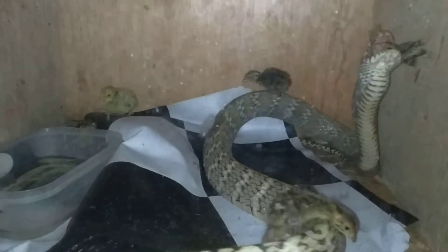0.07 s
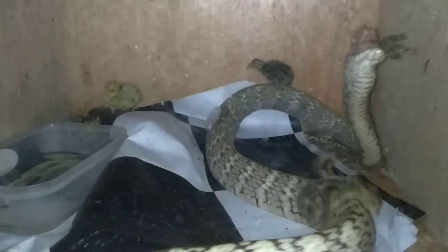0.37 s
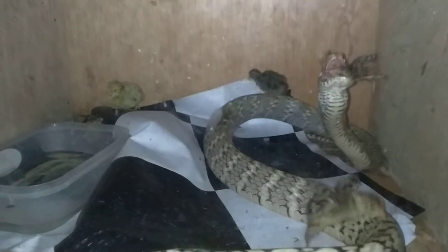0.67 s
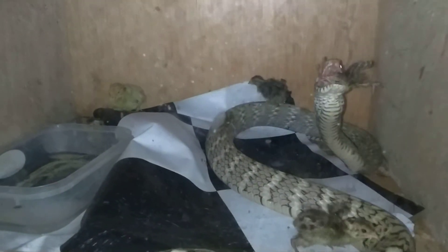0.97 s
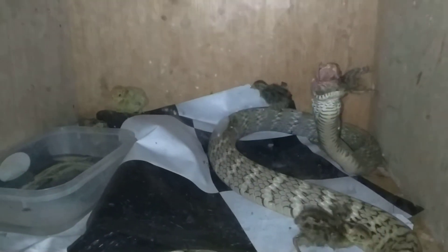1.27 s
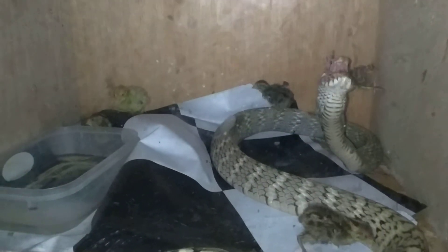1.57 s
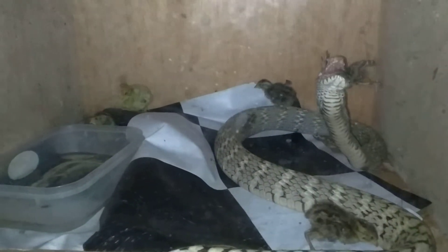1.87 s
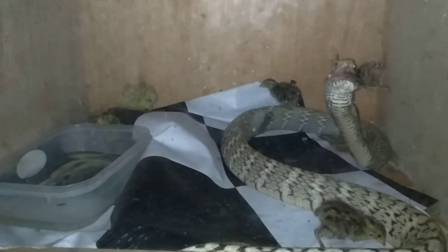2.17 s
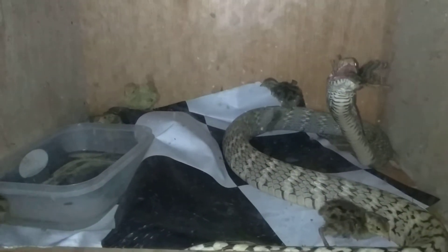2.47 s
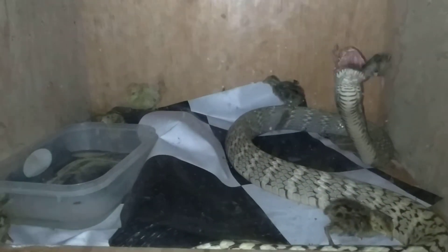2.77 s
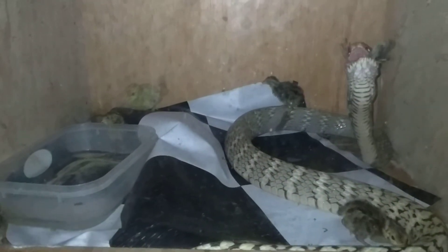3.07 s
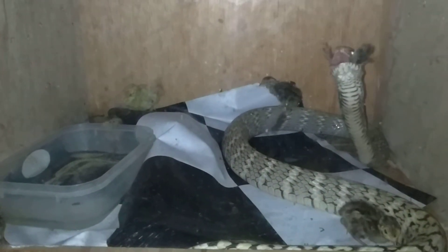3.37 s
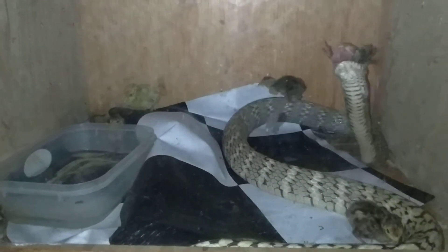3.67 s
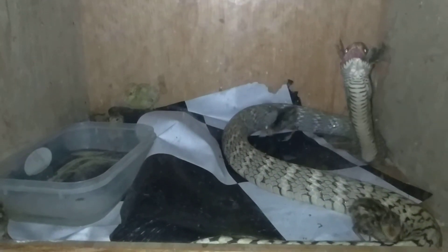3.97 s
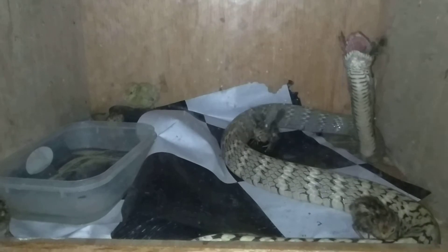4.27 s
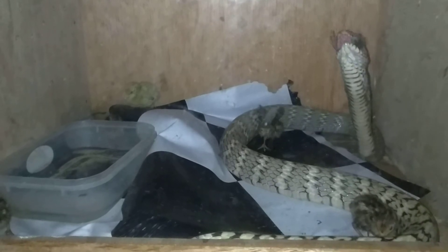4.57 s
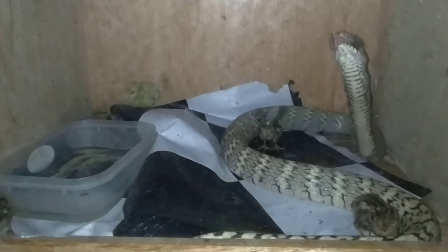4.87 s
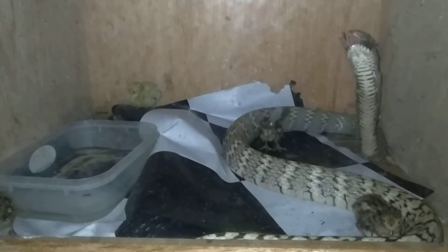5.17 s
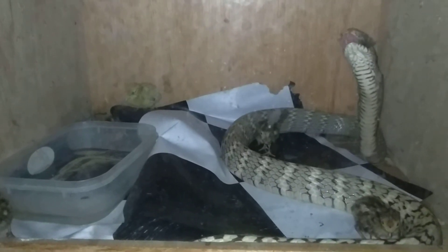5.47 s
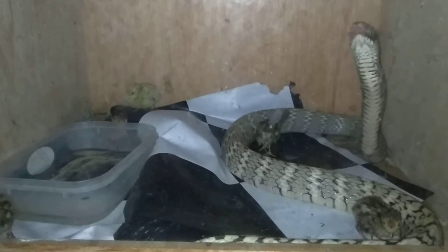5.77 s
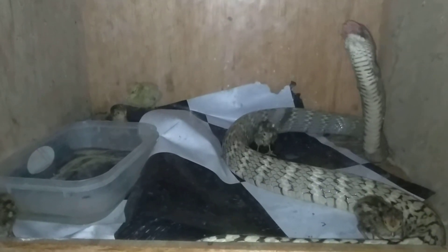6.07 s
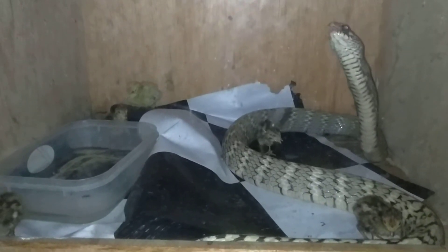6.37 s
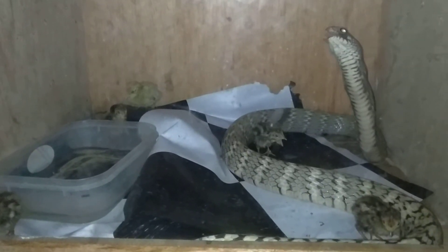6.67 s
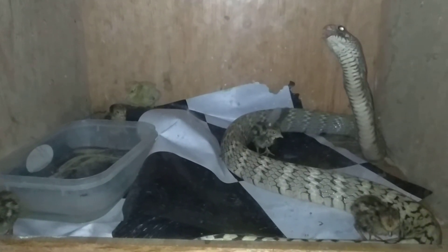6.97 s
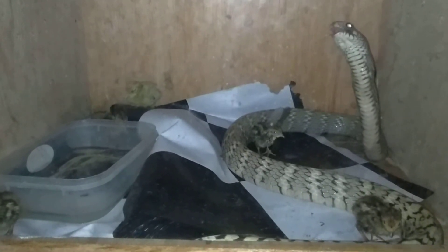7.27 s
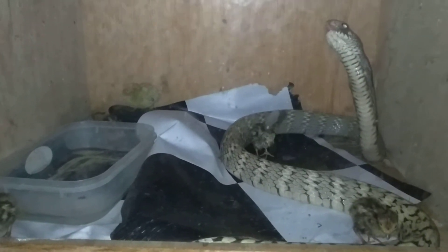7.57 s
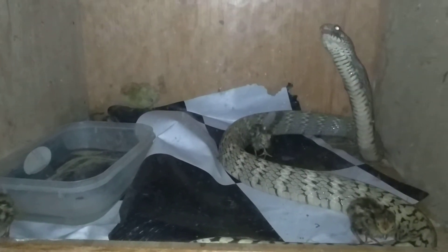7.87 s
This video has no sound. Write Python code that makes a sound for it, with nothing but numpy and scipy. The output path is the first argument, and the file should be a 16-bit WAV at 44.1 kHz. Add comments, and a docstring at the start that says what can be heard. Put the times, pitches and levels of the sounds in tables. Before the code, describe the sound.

After a short brush and click on the microphone, small chicks cheep and scuffle in a wooden box, their peeps growing louder.

```python
"""A plywood box in a quiet room. Chicks peep, softly at first, then loudly: harmonic syrinx tones shaped
by throat and beak, with thin hoarse cheeps between. Their feet scuff a cloth; the walls echo both,
and the panels ring low when bumped. Something brushes the right microphone port and it clicks.
The room rumbles and hisses faintly; a thin electric whine sits in the right channel."""
import sys
import numpy as np
from scipy import signal
from scipy.fft import rfft, irfft
from scipy.io import wavfile

SR = 44100
rng = np.random.default_rng(int(sys.argv[2]) if len(sys.argv) > 2 else 0)


def generate_wav(signal):
    """Clip the signal to [-1, 1] and save it as 16-bit WAV at the path in sys.argv[1]."""
    frames = np.transpose(np.atleast_2d(signal))
    scaled = np.clip(frames, -1, 1) * 32767
    pcm = np.round(scaled).astype(np.int16)
    wavfile.write(sys.argv[1], SR, pcm)


N = 349713

# rumble spectrum: freq_hz, density_db
RUMBLE_SPECTRUM = [(15, -2), (35, -1), (55, 0), (70, -7.5), (110, -9), (165, -13.5), (280, -15.5),
                   (400, -19), (550, -27.5), (950, -28), (1400, -37), (1700, -38.5), (4000, -72)]
# rumble, left against right: freq_hz, correlation
RUMBLE_CORRELATION = [(30, 0.88), (100, 0.97), (250, 0.99), (500, 0.87), (1000, 0.055), (16000, 0.94)]
# room peaks and one dip: freq_hz, width_hz, gain_db
ROOM_MODES = [(55.9, 4.6, 8), (81.7, 6.3, 0.5), (307, 49, 2), (328, 11, -9.5), (859, 33, 4)]
# hiss spectra, left then right: freq_hz, density_db
HISS_SPECTRA = [
    [(1000, -9.5), (1900, 0), (2400, 5.5), (3000, -3.5), (5000, -12), (6100, -10), (8200, -10.5),
     (11000, -16), (16000, -20)],
    [(1000, -8.5), (1900, -9.5), (2400, -6), (3000, -2), (5000, -5), (6100, -5), (8200, -4), (11000, -8),
     (16000, -19)],
]
# narrow hiss bands: freq_hz, width_hz, level_db, pan_db (left minus right)
HISS_BANDS = [(2377, 19, -68, -1), (7324, 290, -66, 10), (6840, 880, -64.5, 3.5)]
# whine harmonics: multiple, level_db
WHINE_HARMONICS = [(2, -67.5), (3, -66.5), (4, -71.5), (5, -70.5), (6, -75.5)]
# bumps on the box: start_s, freq_hz, level_db, t60_s
PANEL_BUMPS = [(3.235, 45.6, -28, 0.28), (3.479, 105, -36.5, 0.26), (3.68, 144, -29, 0.048),
               (3.701, 58, -27.5, 0.27), (5.712, 236, -29.5, 0.0098)]
# brush spectrum: freq_hz, density_db
BRUSH_SPECTRUM = [(40, -2.5), (110, -10), (250, -0.5), (400, -7), (560, -4.5), (800, -16.5), (1100, -21),
                  (2000, -21.5), (9000, -24), (12500, -31.5), (16000, -48)]
# impulses at the right port: start_s, level_db
PORT_CLICKS = [(0.576, -29.5), (1.182, -11), (1.1842, -19), (1.377, -35)]
# click resonances: freq_hz, gain_db, t60_s
CLICK_MODES = [(4420, -6, .0018), (6950, -1, 0.0012), (9200, -34, 0.00059)]
# wall echoes, left then right: delay_s, gain_db
WALL_ECHOES = [
    [(.0021, -16.5), (.0053, -18.5), (.0094, -7)],
    [(.0016, -17), (.0061, -51), (.0112, -51)],
]
# cloth friction spectrum: freq_hz, density_db
CLOTH_SPECTRUM = [(1200, 1), (2500, -5), (5000, -4), (8000, 0.5), (11000, -4.5), (13000, -13), (16000, -15)]
# feet on cloth: start_s, length_s, level_db, pan_db
FOOT_SCUFFS = [(.171, 0.063, -56.5, -2), (0.393, .034, -53.5, -2), (0.463, 0.067, -51, -6),
               (0.65, 0.095, -48, -13), (.75, 0.067, -52.5, 0), (2.131, 0.065, -51, 4),
               (2.18, 0.12, -49.5, 4), (2.29, .08, -51.5, 4), (2.581, .012, -44, 3), (2.594, .022, -51, 8),
               (3.875, .02, -49.5, 3), (3.975, 0.015, -53, 5), (4.036, 0.037, -54.5, 3),
               (6.432, 0.02, -55, 8)]
# hoarse cheeps: start_s, length_s, start_hz, end_hz, relative_db, octave_db, rasp_ratio
HOARSE_CHEEPS = [(0.975, .06, 2900, 2150, -67.5, 13.5, 0.031), (3.24, 0.05, 2400, 2370, -60, 10, .02),
                 (3.422, .13, 3170, 2980, -61, -20, .012), (3.714, 0.24, 2900, 3990, -57, -20, .08),
                 (4.72, 0.054, 3125, 2950, -61.5, 8, .012), (4.754, .1, 3810, 3300, -57.5, -20, .034),
                 (4.772, 0.11, 3060, 2670, -58, -5, .018), (5.057, 0.11, 2940, 2950, -53.5, -8, 0.062),
                 (5.483, .06, 2850, 2830, -65, 7, 0.014), (5.531, .17, 3480, 3280, -57, -20, 0.018),
                 (5.55, 0.104, 2820, 2740, -55, -10, .009), (5.84, 0.2, 3250, 4300, -60, -20, 0.085),
                 (6.126, 0.041, 2480, 2630, -48, -5, .02), (6.27, 0.068, 2860, 2910, -46.5, -15, 0.049),
                 (7.731, 0.16, 2700, 3440, -54, -6, 0.16)]
# throat and beak response: freq_hz, gain_db
THROAT_RESPONSE = [(3300, -17), (3650, -3), (4400, -2.5), (5400, 6.5), (5950, -2), (6600, -9),
                   (7250, -17.5), (8400, -11.5), (9100, -18), (9700, -28.5), (11000, -20.5), (12200, -41),
                   (13300, -30), (14500, -47)]
# notes, one to three per peep: start_s, length_s, attack_s, pitch_hz, scoop_hz, rise_hz, level_db,
# opening_db (overtone gain of the open beak), undertone_db, pan_db
PEEP_NOTES = [(1.417, 0.056, .012, 2660, -1, 27, -60.5, -9, -24, 5),
              (1.469, 0.051, .006, 2530, 183, 15, -56, -14, -24, 6),
              (1.551, 0.028, 0.015, 2674, 183, 0, -53, -11, -24, 0),
              (2.429, 0.066, .012, 2456, 200, 8, -55.5, -8, -16, 10),
              (2.498, 0.039, .01, 2613, 113, -11, -58, 7, -9, 4),
              (3.138, 0.067, 0.017, 2400, 196, 9, -56, 9.5, -15, 4),
              (3.216, 0.061, 0.0069, 2597, 3, 27, -57.5, -0.5, -5, 4),
              (5.055, 0.049, 0.0081, 2380, 63, 50, -53, -11, -16, 2),
              (5.143, 0.022, .008, 2437, 224, 0, -53, -19, -15, 2),
              (5.172, 0.038, 0.013, 2370, 148, -17, -45.5, -2.5, -7, 2),
              (6.169, 0.054, 0.0098, 2460, 138, 22, -44, 7.5, -17, 4.5),
              (6.242, 0.084, 0.0036, 2204, 416, -3.5, -52.5, 16.5, -23, 3),
              (6.981, .084, 0.02, 2388, 92, 30.5, -43, 14.5, -16, 5),
              (7.078, 0.038, .0035, 2196, 338, 16, -45.5, 13, -34, 3),
              (7.128, 0.035, 0.0042, 2191, 3.5, 9, -48, 15.5, -26, 2),
              (7.837, 0.093, 0.0046, 2250, 120, 132, -42, 11.5, -22, 3)]

LEAD_S, RELEASE_S = .025, .0066   # soft voicing before a note; fade after it


def from_db(db):
    """Decibels to gain."""
    return 10 ** (np.asarray(db) / 20)


def unit_rms(x):
    """Scale to unit power."""
    return x / np.sqrt(np.mean(x ** 2) + 1e-20)


def at_hz(points, hz):
    """Interpolate over log frequency."""
    freq_hz, value = np.transpose(points)
    return np.interp(np.log(np.maximum(hz, 1)), np.log(freq_hz), value)


def pan(pan_db):
    """Constant-power gains for a left-minus-right level."""
    return unit_rms(from_db(np.array([[pan_db], [-pan_db]]) / 2))


def bins_hz():
    """Full-length FFT frequencies."""
    return np.arange(N // 2 + 1) * SR / N


def bell(hz, width_hz):
    """Resonance curve, peak 1."""
    return 1 / (1 + ((bins_hz() - hz) / width_hz * 2) ** 2)


def noise(spectrum):
    """Coloured noise, rms 1."""
    return unit_rms(irfft(rfft(rng.standard_normal(N)) * from_db(at_hz(spectrum, bins_hz())), N))


def wobble(rate_hz, size):
    """Low-passed random motion, rms 1."""
    sos = signal.butter(2, rate_hz, fs=SR, output="sos")
    return unit_rms(signal.sosfilt(sos, rng.standard_normal(size + SR // 4))[-size:])


def add(out, start_s, sound):
    """Mix in a stereo sound."""
    i = max(int(start_s * SR), 0)
    out[:, i:i + sound.shape[-1]] += sound[:, :max(N - i, 0)]


def room_rumble(level_db=-40.5, left_lag_s=.00016, start_db=-1, settle_s=.56):
    """Low noise shaped by room modes; reaches the right port first."""
    correlation = np.clip(at_hz(RUMBLE_CORRELATION, bins_hz()), -1, 1)
    mid = rfft(noise(RUMBLE_SPECTRUM)) * np.sqrt(1 + correlation)
    side = rfft(noise(RUMBLE_SPECTRUM)) * np.sqrt(1 - correlation)
    lag = np.exp(-2j * np.pi * bins_hz() * left_lag_s)
    modes = from_db(sum(gain_db * bell(hz, width_hz) for hz, width_hz, gain_db in ROOM_MODES))
    rumble = unit_rms(irfft(modes * np.array([(mid + side) * lag, mid - side]), N))
    swell_db = np.interp(np.arange(N) / SR, [0, settle_s], [start_db, 0])
    return rumble * from_db(level_db + swell_db)


def room_hiss(left_db=-57, right_db=-63.5):
    """Broad hiss plus narrow rushing bands."""
    out = from_db([[left_db], [right_db]]) * np.array([noise(spectrum) for spectrum in HISS_SPECTRA])
    for hz, width_hz, level_db, pan_db in HISS_BANDS:
        band = irfft(rfft(rng.standard_normal((2, N))) * bell(hz, width_hz), N)
        out += unit_rms(band) * from_db(level_db) * pan(pan_db)
    return out


def electric_whine(base_hz=2273.6, onset_s=.1, full_s=.75, leak_db=-27):
    """Steady harmonics, no fundamental; fades in on the right."""
    t = np.arange(N) / SR
    tone = sum(from_db(db) * np.sin(2 * np.pi * k * base_hz * t) for k, db in WHINE_HARMONICS)
    return np.sqrt(2) * tone * np.interp(t, [onset_s, full_s], [0, 1]) * from_db([[leak_db], [0]])


def panel_bumps():
    """Damped low rings of the box panels."""
    out, t = np.zeros((2, N)), np.arange(SR // 2) / SR
    for start_s, hz, level_db, t60_s in PANEL_BUMPS:
        add(out, start_s, np.sin(2 * np.pi * hz * t) * from_db(level_db - 60 * t / t60_s) * pan(0))
    return out


def port_brush(peak_s=.8718, peak_db=-17.5, rise_s=.036, fall_s=.042, edge_s=.007, slope_db_per_s=430):
    """Grainy friction on the port: touch, press to one peak, ease, lift."""
    t = np.arange(N) / SR - peak_s
    contact = np.clip(np.minimum(t + rise_s, fall_s - t) / edge_s, 0, 1)
    friction = noise(BRUSH_SPECTRUM)
    grain_db = 1.5 * wobble(310, N)
    return contact * friction * from_db(peak_db - slope_db_per_s * np.abs(t) + grain_db)


def port_clicks(lowpass_hz=12500):
    """Impulses ring short, high resonances at the port."""
    out, taps = np.zeros(N), np.full(N, 1e-18)
    for start_s, level_db in PORT_CLICKS:
        taps[int(start_s * SR)] += from_db(level_db)
    taps = signal.sosfilt(signal.butter(4, lowpass_hz, fs=SR, output="sos"), taps)
    for hz, gain_db, t60_s in CLICK_MODES:
        radius, angle = from_db(-60 / (t60_s * SR)), 2 * np.pi * hz / SR
        out += from_db(gain_db) * signal.lfilter([1, -1], [1, -2 * radius * np.cos(angle), radius ** 2], taps)
    return out


def box_echoes(sound, t60_s=.2, build_s=.011, tail_db=-13, direct_db=-.35):
    """Near walls: direct path, three echoes per side, short diffuse tail."""
    t = np.arange(SR // 3) / SR
    out = []
    for channel, echoes in zip(sound, WALL_ECHOES):
        response = rng.standard_normal(len(t)) * from_db(-60 * t / t60_s) * np.clip(t / build_s, 0, 1)
        response *= from_db(tail_db) / np.sqrt(np.sum(response ** 2))
        response[0] += from_db(direct_db)
        for delay_s, gain_db in echoes:
            response[int(delay_s * SR)] += from_db(gain_db)
        out.append(signal.fftconvolve(channel, response)[:N])
    return np.array(out)


def foot_scuffs(grain_db=-.5, catch_db=1.5, rise_ratio=.17):
    """Feet catch and slip on cloth: swells of grainy friction noise."""
    envelope, t = np.zeros((2, N)), np.arange(N) / SR
    for start_s, length_s, level_db, pan_db in FOOT_SCUFFS:
        swell = np.interp(t, start_s + length_s * np.array([0, rise_ratio, 1]), [0, 1, 0])
        envelope += swell * from_db(level_db) * pan(pan_db)
    grip = unit_rms(from_db(grain_db * wobble(770, N) + catch_db * wobble(32, N)))
    return envelope * grip * np.array([noise(CLOTH_SPECTRUM), noise(CLOTH_SPECTRUM)])


def cheep(length_s, start_hz, end_hz, octave_db, rasp_ratio, waver_ratio=.0137, flutter_db=2.5):
    """Thin, hoarse, wavering glide plus its octave."""
    progress = np.linspace(0, 1, int(length_s * SR))
    size = len(progress)
    glide_hz = start_hz + (end_hz - start_hz) * progress
    hz = glide_hz * (1 + waver_ratio * wobble(48, size) + rasp_ratio * wobble(510, size))
    phase = 2 * np.pi * np.cumsum(hz) / SR
    swell = np.sqrt(np.abs(np.sin(np.pi * progress)))
    flutter = unit_rms(from_db(flutter_db * wobble(72, size)))
    return (np.sin(phase) + from_db(octave_db) * np.sin(2 * phase)) * swell * flutter


def peep_note(length_s, attack_s, pitch_hz, scoop_hz, rise_hz, opening_db, undertone_db):
    """Syrinx tone, octave near the throat resonance; rough until it drops onto its pitch."""
    lock_s, ragged_s, slip_ratio = .00388, .0066, .45
    flick_ratio, flick_s, flick_above_hz, flick_db = .0376, .0102, 2227, -5.5
    shut_beak_db, jitter_ratio, husk_ratio = -10, .00064, .01
    undertone_fade_db, dulling_db_per_octave = -7, -3.5
    lead_db, sag_db, shimmer_db = -7.5, -2, 2.5

    t = np.arange(-LEAD_S, length_s + RELEASE_S, 1 / SR)
    since_s, progress = np.maximum(t, 0), np.clip(t / length_s, 0, 1)
    push = np.sin(np.pi / 2 * np.clip(t / attack_s, 0, 1))
    opening = from_db(opening_db * push + shut_beak_db * (1 - push))
    # higher notes flick upward and thin out as they end
    flick = (pitch_hz > flick_above_hz) * np.exp(np.minimum(t - length_s, 0) / flick_s)
    flick_hz = flick_ratio * pitch_hz * flick
    unsettled_hz = scoop_hz * np.exp(-since_s / ragged_s) + flick_hz
    slips_hz = slip_ratio * unsettled_hz * np.maximum(wobble(360, len(t)), 0)
    hz = pitch_hz + scoop_hz * np.exp(-since_s / lock_s) + rise_hz * progress + flick_hz + slips_hz
    roughness = jitter_ratio + husk_ratio / (1 + opening ** 2)   # husky with the beak nearly shut
    hz *= 1 + roughness * wobble(360, len(t))
    phase = 2 * np.pi * np.cumsum(hz) / SR
    # alternate cycles differ under tension: weak lines between the harmonics
    between_db = undertone_db + undertone_fade_db * progress
    voice = np.sin(phase)
    for k in np.arange(3, 14) / 2:
        colour_db = at_hz(THROAT_RESPONSE, k * hz) + dulling_db_per_octave * progress * np.log2(k / 2)
        voice += opening * from_db(colour_db + (between_db if k % 1 else 0)) * np.sin(k * phase)
    fade = np.clip(np.minimum(2 * (t + LEAD_S) / LEAD_S, (t[-1] - t) / RELEASE_S), 0, 1)
    effort_db = lead_db * (1 - push) + sag_db * progress + flick_db * flick
    return np.sqrt(2) * voice * fade * from_db(effort_db + shimmer_db * wobble(84, len(t)))


def chicks(cheep_trim_db=-3.5, left_lag_s=.00004, shade_db=-5.5, shade_hz=7550):
    """Peeps and cheeps; sooner at the right port, and duller there as the beak faces left."""
    out = np.zeros((2, N))
    for start_s, *shape, level_db, opening_db, undertone_db, pan_db in PEEP_NOTES:
        voice = peep_note(*shape, opening_db, undertone_db)
        add(out, start_s - LEAD_S, voice * from_db(level_db) * pan(pan_db))
    for start_s, length_s, start_hz, end_hz, relative_db, octave_db, rasp_ratio in HOARSE_CHEEPS:
        voice = cheep(length_s, start_hz, end_hz, octave_db, rasp_ratio)
        add(out, start_s, voice * from_db(relative_db + cheep_trim_db) * pan(pan_db=5))
    left, right = out
    late_left = np.pad(left, (round(left_lag_s * SR), 0))[:N]
    treble = signal.sosfilt(signal.butter(1, shade_hz, "high", fs=SR, output="sos"), right)
    return np.array([late_left, right - (1 - from_db(shade_db)) * treble])


def scene(port_leak_db=-38):
    """Chicks and scuffs echo in the box; the rest arrives direct."""
    in_box = box_echoes(chicks() + foot_scuffs())
    at_port = (port_brush() + port_clicks()) * from_db([[port_leak_db], [0]])
    return room_rumble() + room_hiss() + electric_whine() + panel_bumps() + at_port + in_box


def record(dry, cutoff_hz=15900):
    """Steep low-pass."""
    return signal.sosfilt(signal.ellip(10, .1, 80, cutoff_hz, fs=SR, output="sos"), dry)


dry = scene()
out = record(dry)
generate_wav(out)
```